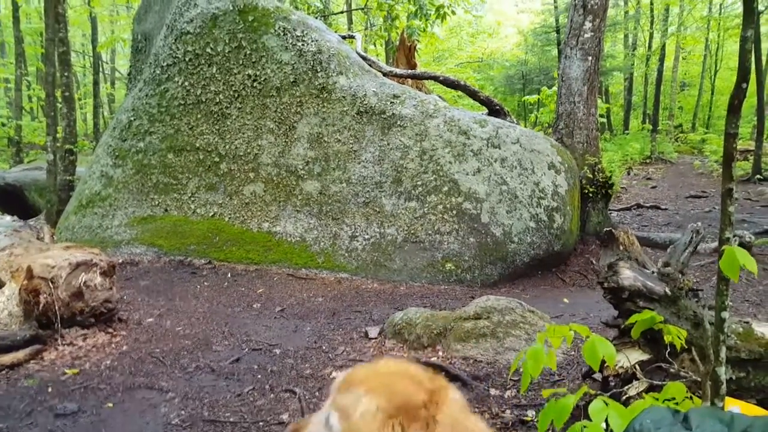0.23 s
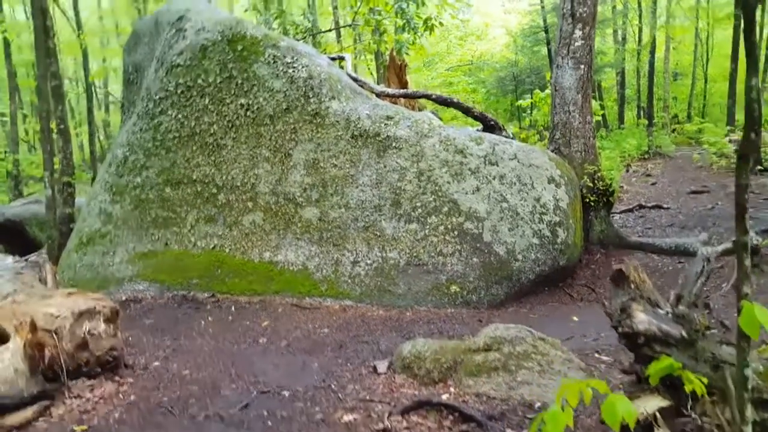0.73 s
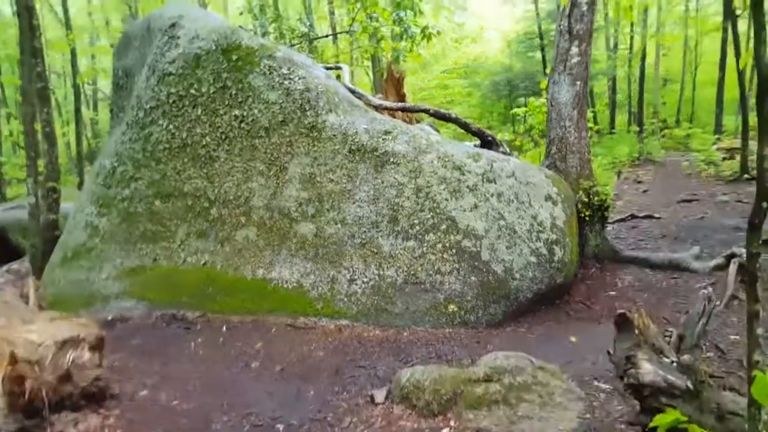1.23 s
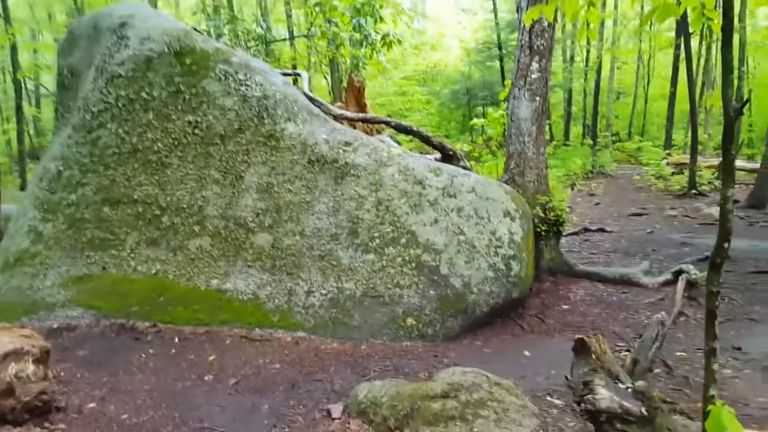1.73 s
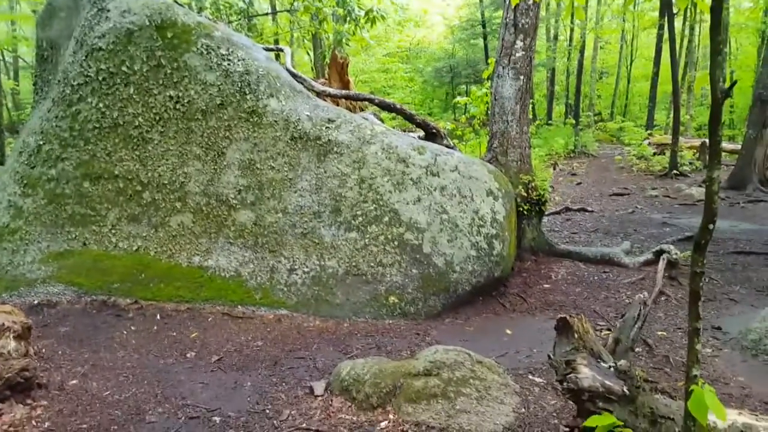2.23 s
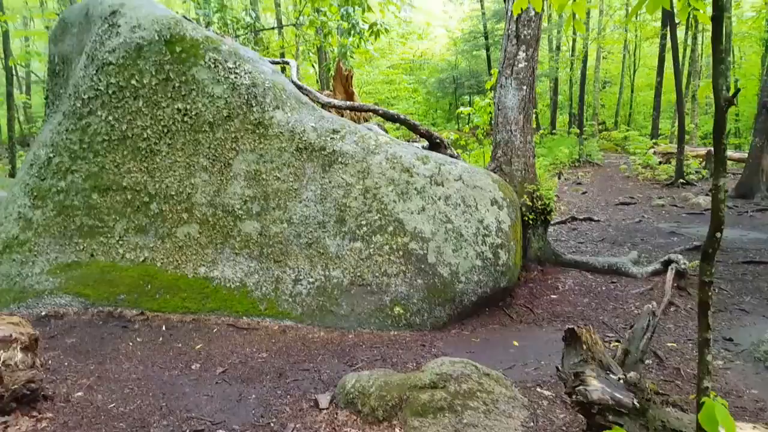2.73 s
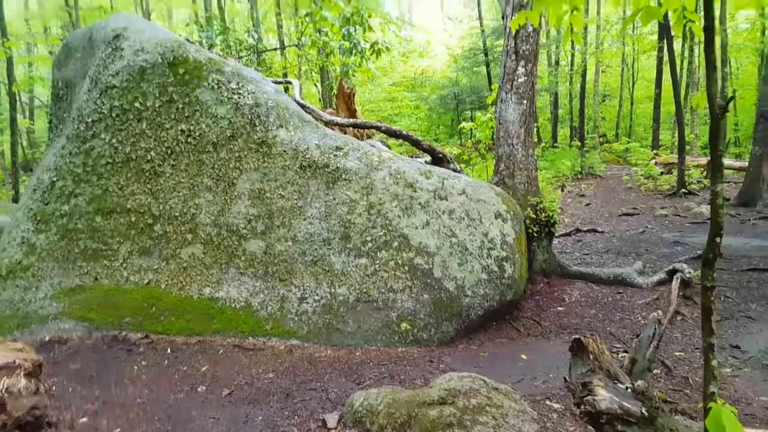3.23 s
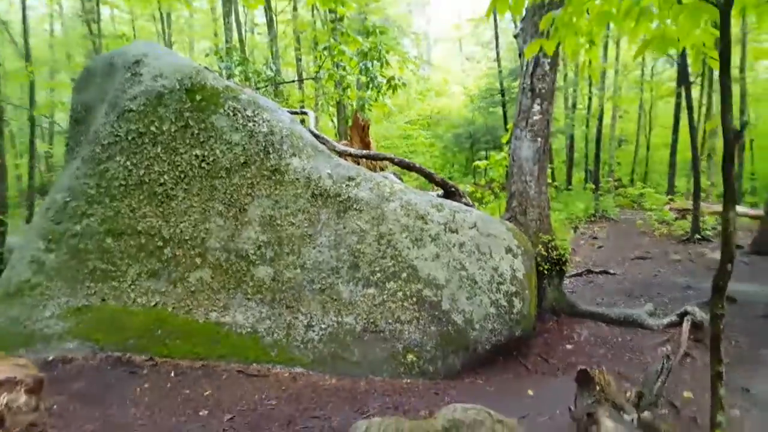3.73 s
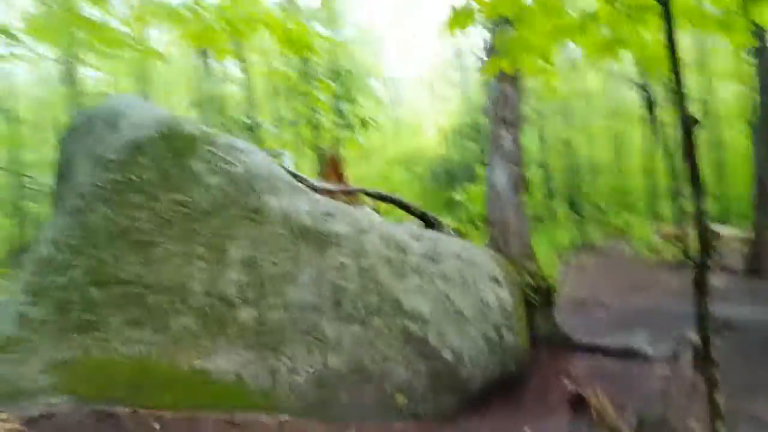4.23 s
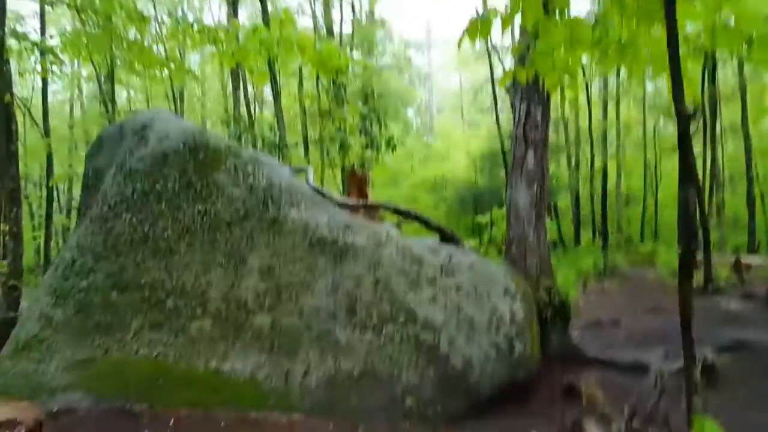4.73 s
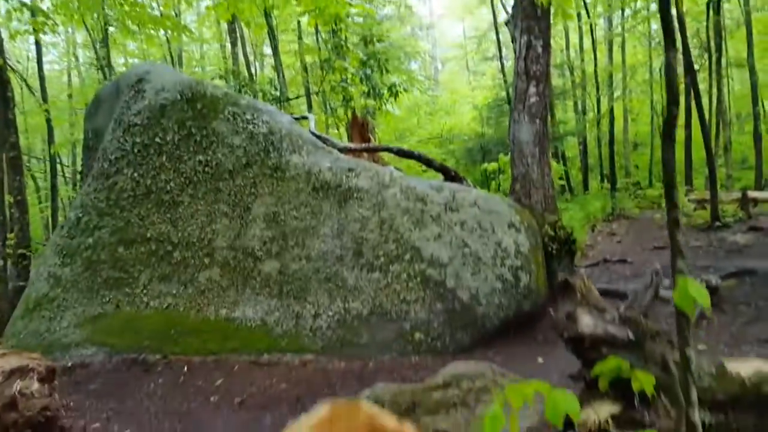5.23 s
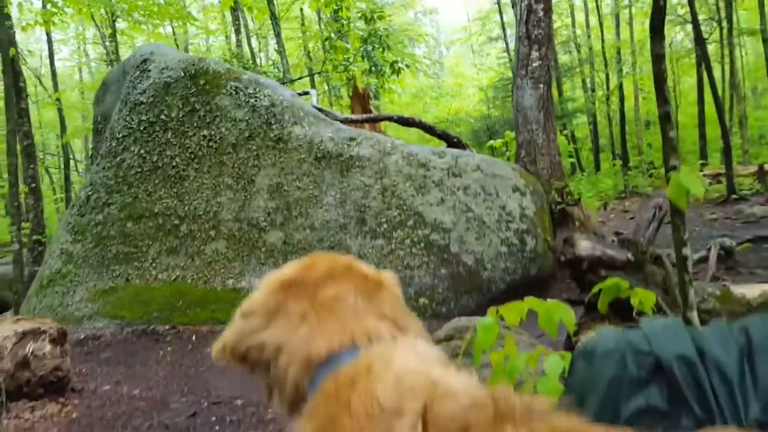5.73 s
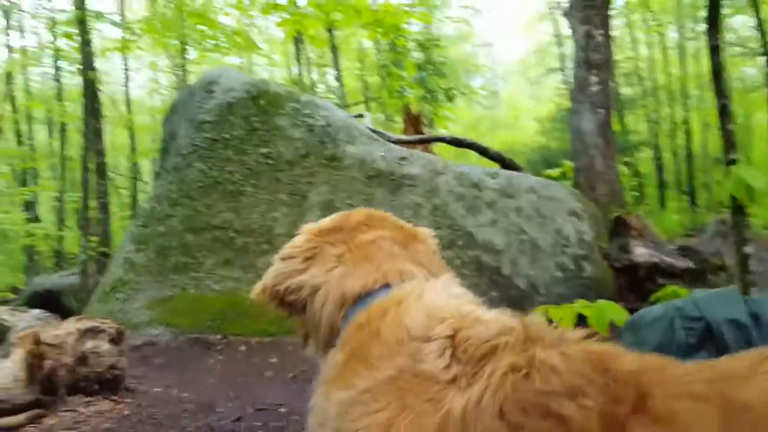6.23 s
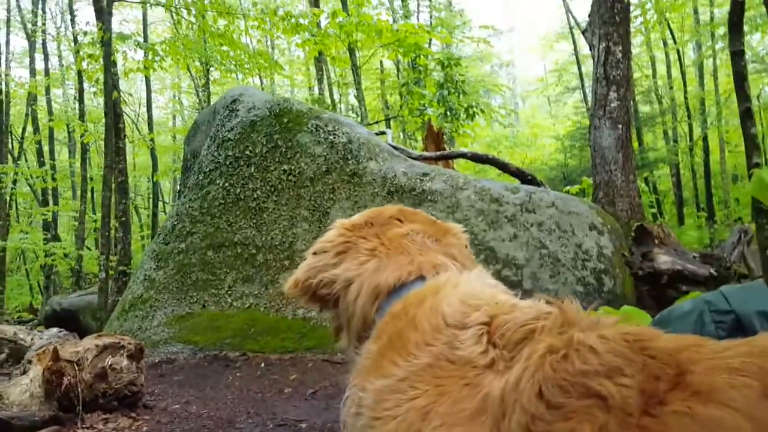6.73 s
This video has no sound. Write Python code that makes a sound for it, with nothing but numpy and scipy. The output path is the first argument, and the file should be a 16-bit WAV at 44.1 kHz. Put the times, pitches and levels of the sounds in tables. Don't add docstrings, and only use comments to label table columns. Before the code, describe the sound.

Handheld stereo phone, close to a dog outdoors: sleeve rustle and scattered drips first, then a steady rumbling growl fluttering about twenty times a second. It drops away, leaving drips and a soft paw thud. A sudden hissing click and rubbing hits the right side, muffling it momentarily. The dog growls again, slips into a brief pure hoot, and resumes lower. There is almost no echo.

```python
import sys
import numpy as np
from scipy import signal
from scipy.fft import rfft, irfft
from scipy.io import wavfile
from scipy.ndimage import uniform_filter1d, map_coordinates

SR = 44100
rng = np.random.default_rng(int(sys.argv[2]) if len(sys.argv) > 2 else 0)


def to_wav(s):
    ch = np.atleast_2d(s).T
    pcm = np.round(np.clip(ch, -1, 1) * 32767)
    wavfile.write(sys.argv[1], SR, pcm.astype(np.int16))


def ratio(d):
    e = np.asarray(d, float) / 20
    return 10 ** e


N = 307816
T = np.arange(N) / SR

# (frequency [Hz], density [dB per Hz])
FOREST = [(24, -30), (40, -3.5), (219, -4), (657, -6.5), (744, -3), (1660, -3.5), (2470, -4), (7610, -16),
          (10300, -24.5), (11600, -25), (15700, -31)]
# (frequency [Hz], likeness [-1 to 1])
ALIKE = [(60, 0.63), (130, 1), (290, 1), (640, 0.54), (1410, -0.49), (3100, 0.23), (6820, -0.53),
         (15000, 0.42)]
# (frequency [Hz], left minus right [dB])
LEAN = [(60, 5), (300, 7), (1300, 1), (4400, -2.5), (15000, 7)]
# (frequency [Hz], density [dB per Hz])
CLOTH = [(100, -10), (500, -8), (1700, -4.5), (2500, -2), (3600, -6.5), (7000, -10.5), (10000, -15.5),
         (13000, -18), (15700, -20.5)]
# (start [s], length [s], peak level [dB])
RUSTLES = [
    (0.23, 0.67, -43.5),
    (0.597, 0.99, -48.5),
    (1.498, 1.3, -62),
    (3.898, 0.31, -66),
    (4.384, 0.12, -51.5),
    (4.96, 0.61, -48.5),
    (5.393, 0.98, -50.5),
    (6.1, 0.89, -58.5),
]
# (frequency [Hz], time to fall 60 dB [s])
TREES = [(100, 0.09), (1000, 0.085), (8000, 0.08)]

# (time [s], peak level [dB], frequency [Hz], left minus right [dB])
DULL_DROPS = [(.305, -27, 620, 2), (.344, -40, 635, 4), (.874, -38, 1090, 8), (.8895, -37, 594, 3),
              (.894, -36.5, 510, 4), (.903, -39, 990, 2), (.9505, -36, 1300, 2), (.96, -29, 900, -3),
              (.977, -29.5, 3040, 6), (1.4631, -38, 1340, 5), (1.8781, -31, 1270, -4),
              (1.93, -36, 2787, -7), (2.151, -40, 1201, 0), (2.938, -35, 574.2, 3),
              (3.096, -43.5, 423, -12), (3.122, -40, 439, 4), (3.166, -29.5, 566, 4),
              (3.708, -42.5, 1610, -11), (3.81, -37, 1070, -3), (3.924, -36.5, 423, 1.5),
              (3.944, -39, 470, 3), (3.98, -35, 466, .6), (4.528, -40, 476, 3), (4.059, -38, 630, 0),
              (4.103, -29.5, 600, 1), (5.3844, -36.5, 1470, -5), (5.5694, -41, 1220, 2),
              (6.0192, -35, 1990, -7), (6.0666, -38.5, 1460, -7), (6.2332, -42, 1230, -2),
              (6.8319, -36, 1100, -9)]
# (time [s], peak level [dB], frequency [Hz], left minus right [dB])
LEAF_DROPS = [
    (.054, -38, 458, 1.5),
    (.096, -39, 507, 3),
    (.717, -35, 590, -5),
    (1.3404, -36.5, 1400, 0),
    (1.3894, -32.5, 877, 0),
    (2.4329, -35.5, 3360, -8),
    (5.6894, -38.5, 2650, -4),
]
# (time [s], peak level [dB], frequency [Hz], left minus right [dB])
THUDS = [
    (.31, -36.5, 256, 2),
    (1.002, -40, 110.7, -4),
    (1.023, -37, 101, -9),
    (2.95, -45.5, 89, 5),
    (4.105, -32.5, 260, 0),
]
# (time [s], peak level [dB], frequency [Hz], left minus right [dB])
SPRAY = [(.268, -58.5, 6000, 0), (1.478, -58, 6100, -1.5), (3.038, -62.5, 6000, -4), (3.203, -57, 6030, 3),
         (3.2335, -56, 5000, 0), (3.6775, -57, 6000, -4), (3.86, -59, 6030, 0), (5.624, -61, 5940, -3)]

# (time [s], hiss level [dB], gap resonance [Hz], seal [0-1], rubbing level [dB])
SLIDE_ON = [
    (4.54, -55, 7500, 0, -53),
    (4.572, -29.5, 7400, 0.24, -44),
    (4.596, -21, 5500, 0, -42),
    (4.611, -13, 1960, 0.28, -32),
    (4.628, -19.5, 3550, 0.1, -41),
    (4.647, -23, 4750, .1, -27),
    (4.657, -34, 5000, 0.1, -20),
    (4.69, -73, 2500, .85, -32),
    (4.745, -90, 1200, .99, -64),
]
# (time [s], hiss level [dB], gap resonance [Hz], seal [0-1], rubbing level [dB])
SLIDE_OFF = [
    (4.758, -74, 900, 0.81, -32),
    (4.796, -54, 1300, .75, -32),
    (4.81, -39, 1690, 0.73, -25),
    (4.84, -37.5, 2500, 0.86, -26),
    (4.863, -35, 3430, 0.63, -23.5),
    (4.877, -38, 3560, 0.14, -35),
    (4.89, -46.5, 2490, 0.027, -42),
    (4.95, -48, 2600, 0, -43.5),
    (5.0, -70, 2000, 0, -59),
]
# (time [s], level [dB])
SQUEAK = [(4.895, -95), (4.92, -53), (4.96, -54), (4.99, -95)]
# (time [s], peak level [dB], frequency [Hz])
PUMPS = [(4.581, -25, 1350), (4.59, -24, 1250), (4.6, -21, 1400), (4.605, -18, 1050), (4.61, -12, 1200),
         (4.65, -18, 116), (4.665, -18, 333), (4.684, -21.5, 110), (4.712, -27, 120), (4.754, -25, 110),
         (4.767, -14, 190), (4.783, -27, 400), (4.801, -18, 300)]
# (frequency [Hz], gain [dB])
SEAL_CUTS = [(4300, 0), (6200, -35), (10000, -35), (12000, 0)]

# (frequency [Hz], phase by which the left leads [rad])
LEAD = [(80, 0.073), (200, 0.14), (400, 0.067), (1000, .56)]
# (time [s], pitch [Hz], level [dB])
HOOT = [(6.146, 175.8, -64), (6.156, 173, -26), (6.175, 162.4, -25), (6.195, 156.3, -20), (6.23, 153, -25),
        (6.27, 146.6, -22), (6.287, 145, -26), (6.3, 141, -60)]
# (multiple [1], level [dB])
HOOT_ORDERS = [(1, -5), (2, -21), (3, -23.5), (4, -31)]
# (frequency [Hz], gain [dB])
SHUT = [(30, -64), (70, 5.5), (100, 3), (200, 2), (300, -4.5), (420, -5), (520, -39), (700, -15.5),
        (2500, -68)]
# (frequency [Hz], gain [dB])
OPEN = [(30, -19.5), (70, -3), (105, -3.5), (210, -1.5), (260, -9), (320, -0.5), (420, -1.5), (520, -21),
        (640, -13), (750, -20.5), (900, -39.5), (1080, -29), (1300, -38), (2500, -90)]
# (frequency [Hz], gain [dB])
TURNED_SHUT = [(30, -55), (70, 2.5), (95, 0), (190, -0.5), (270, -1.5), (370, -2.5), (470, -28.5),
               (650, -15), (800, -33.5), (2500, -57)]
# (frequency [Hz], gain [dB])
TURNED_OPEN = [(30, -19), (70, -8.5), (100, -1), (200, 1), (260, -28.5), (320, -9), (500, -11),
               (620, -15.5), (720, -31), (1000, -34), (1350, -30), (1700, -41.5), (2500, -73)]
# (frequency [Hz], gain [dB])
DEEP = [(30, -11), (65, -12), (90, 0), (180, 2), (260, -17.5), (360, -9), (450, -16.5), (550, -9),
        (640, -20.5), (780, -29), (2500, -72)]
THROATS = [(SHUT, OPEN), (TURNED_SHUT, TURNED_OPEN), (DEEP, TURNED_OPEN)]
# (time [s], fold beat [Hz], level [dB], mouth opening [0-1])
GROWLS = [
    [(1.06, 79.2, -42, 0.3), (1.17, 91.3, -33.5, 0.22), (1.33, 106.3, -30, 0.3), (1.7, 108.7, -29.5, 0.95),
     (2.15, 114, -28.5, 0.93), (2.55, 104, -28.5, 0.88), (2.76, 94.8, -30, 0.65), (2.82, 84, -37, 0.24),
     (2.87, 80, -76, 0)],
    [(4.775, 75.5, -54, .2), (4.83, 75.6, -42, 0.5), (4.97, 84.5, -36.5, 0.4), (5.16, 98.7, -32.5, 0.44),
     (5.3, 105, -30, 0.48), (5.55, 104.6, -30, 0.71), (5.95, 104.4, -29.5, 0.81), (6.14, 101.7, -31, 0.9),
     (6.153, 97.2, -28.5, 0.9)],
    [(6.29, 95.4, -31, 0.4), (6.32, 94, -29, 0.6), (6.6, 92.3, -30, 0.3), (6.8, 88.74, -30.5, 0.3),
     (6.98, 85, -31, 0.3)],
]
LEAKS = [.1, .26, .13]
LOOSE = [1.15, 1.5, .9]
RECOVER_DB = [1.2, 0, 0]
# (frequency [Hz], width [Hz], lift [dB])
RINGS = [(320.7, 35, 1), (638, 35, 3), (1093, 60, 3)]
# (time [s], delay [ms], weakening [dB])
MARKED_STUMBLES = [(1.241, 1.5, 3), (1.281, 1.5, 3), (1.321, 1.5, 2), (1.36, 4.9, 2), (1.402, 2.5, 3),
                   (1.44, 4, 3), (1.482, 3, 2), (1.523, 1.6, 3), (1.562, 1.4, 3), (1.6, 2.3, 0),
                   (1.612, 5, 3), (1.626, 0, 4), (1.683, 1.2, 4), (1.693, 0, 8), (1.73, 4, 4), (1.771, 1, 6),
                   (1.809, 2, 2), (1.857, 1, 4.5), (1.895, 1.6, 4), (1.943, 3, 5), (1.983, 2.3, 0),
                   (2.023, 2, .5), (2.071, 2.2, 3), (2.119, 2.3, 5.5), (2.158, 2.2, 0), (2.206, 1.6, 3.5),
                   (2.254, 2.1, 5), (2.293, 1.8, 0), (2.342, 2, 2), (2.391, 2, 1), (2.442, 1.6, 3.5),
                   (2.493, 1.9, 2), (2.535, 2, 1), (2.587, 1.9, 2.5), (2.64, 1.9, 1), (2.683, 1.6, 0),
                   (2.738, 1.5, 0), (2.783, 1.5, 1),
                   (4.983, 1.6, 3), (5.064, 1.6, 3), (5.141, 4.2, 1.5), (5.186, 2.6, 4.5), (5.23, .6, 5),
                  (5.27, 2, 3), (5.311, 4.8, 1.5), (5.355, 1.8, 1.5), (5.396, 5.1, 2), (5.44, 4, 3),
                  (5.483, 4.8, 2.5), (5.526, 4.6, 1), (5.581, .5, 3), (5.621, 0, 3), (5.658, 4, 2),
                  (5.7, 4, 0), (5.743, 1.7, 1), (5.792, 5.1, 1.5), (5.838, 0, 2.5), (5.877, 1.1, 2.5),
                  (5.927, 4.4, 3), (5.97, 1.4, 3), (6.021, 2.8, 2), (6.062, .7, 3.5), (6.114, 0, 4),
                  (6.35, 1, 4), (6.393, 1.3, .5), (6.437, 2, 0), (6.493, 2, 0), (6.549, 1.5, 2),
                  (6.593, 2, 0), (6.639, 1.5, 0), (6.697, 1.8, 0), (6.744, 2.1, 0), (6.791, 1.7, 0),
                  (6.849, 1.7, .5), (6.896, 1.9, 0), (6.943, 2, .5)]
STUMBLES = MARKED_STUMBLES
FLUTTER_S = 0.044


def unit(x):
    return x / np.sqrt(np.mean(x ** 2) + 1e-20)


def along(points, hz):
    f, v = np.transpose(points)
    return np.interp(np.log(hz + 1), np.log(f + 1), v)


def curves(rows, t=T):
    s, *cols = np.transpose(rows)
    return [np.interp(t, s, c) for c in cols]


def wobble(rate):
    return map_coordinates(rng.standard_normal(int(N * rate / SR) + 4), [T * rate])


def causal(x, spectrum):
    gain = ratio(along(spectrum, np.fft.rfftfreq(16384, 1 / SR)))
    cepstrum = irfft(np.log(gain + 1e-6))
    cepstrum[1:8192] *= 2
    cepstrum[8193:] = 0
    response = irfft(np.exp(rfft(cepstrum)))[:8192]
    return signal.fftconvolve(x, response)[:len(x)]


def rush(spectrum, alike, patchy_db):
    hz, _, z = signal.stft(rng.standard_normal((2, N + 1024)), SR, nperseg=1024)
    patches = uniform_filter1d(rng.standard_normal(z.shape[1:]), 12, 0)
    patches = unit(uniform_filter1d(patches, 5, 1))
    turn = np.arccos(np.clip(along(alike, hz), -1, 1))[:, None] / 2
    mid, side = z[0] * np.cos(turn), z[1] * np.sin(turn)
    lean = ratio(along(LEAN, hz)[:, None] / 2)
    pair = np.array([(mid + side) * lean, (mid - side) / lean])
    pair = pair * ratio(along(spectrum, hz)[:, None] + patchy_db * patches)
    return unit(signal.istft(pair, nperseg=1024)[1][:, :N])


def forest():
    level_db = -50 + 0.052 * wobble(4.1) + 0.36 * wobble(12)
    return ratio(level_db) * rush(FOREST, ALIKE, patchy_db=1.1)


def jacket():
    power = 0
    for s, length, db in RUSTLES:
        swell = abs(np.sin(np.pi * np.clip((T - s) / length, 0, 1))) ** 0.85
        power = power + (ratio(db) * swell) ** 2
    likeness = [(300, 0.83), (1500, -0.62), (3000, 0.13)]
    return np.sqrt(power) * ratio(0.5 + 1.4 * wobble(8.2)) * rush(CLOTH, likeness, patchy_db=2.0)


def trees(x):
    hz, t, z = signal.stft(rng.standard_normal((2, SR // 2)), SR, nperseg=256)
    tail = signal.istft(z * ratio(-60 * t / along(TREES, hz)[:, None]), SR, nperseg=256)[1]
    return signal.fftconvolve(x[None], tail / np.linalg.norm(tail[0]), axes=1)[:, :N]


def drop(hz, splash_db):
    t = np.arange(2048) / SR
    noise = rng.standard_normal((3, len(t)))
    band = signal.butter(2, [hz / 2.2, hz * 2.6], "band", fs=SR, output="sos")
    puff = unit(signal.sosfilt(band, noise[0])) * ratio(-60 * t / 0.018)
    ring = np.sin(2 * np.pi * hz * t) * ratio(-60 * t / (0.005 + 4.3 / hz)) * (1 + hz / 4000)
    knock = 2.2 * (ring + 0.22 * puff) * (1 - np.exp(-t / 0.0004)) ** 2
    high = signal.butter(2, 5000, "high", fs=SR, output="sos")
    splash = ratio(splash_db + 4.5 - 60 * t / 0.0068) * signal.sosfilt(high, noise[1:])
    return knock + splash


def drops():
    lag_s = 0.0008
    kinds = [(DULL_DROPS, -23), (LEAF_DROPS, -7.5), (THUDS, -40), (SPRAY, 14.5)]
    rows = [(*row, splash_db) for table, splash_db in kinds for row in table]
    for a, b, c, d in rng.random((220, 4)):
        rows.append((6.9 * a, -50 + 9 * b ** 2, 300 * 9 ** c, 8 * d - 4, -16))
    out = np.zeros((2, N + 2048))
    for s, db, hz, pan_db, splash_db in rows:
        start = round((s + lag_s) * SR)
        sides_db = np.clip(pan_db, -8, 8) * np.array([[0.5], [-0.5]])
        out[:, start:start + 2048] += ratio(db + sides_db) * drop(hz, splash_db)
    return out[:, :N]


def finger(right):
    slide = SLIDE_ON + SLIDE_OFF
    hz, t, z = signal.stft([right, *rng.standard_normal((3, N))], SR, nperseg=256)
    hz = hz[:, None] + 1
    hiss_db, gap_hz, seal, _ = curves(slide, t)
    cover_db = 23 * abs(seal) ** 3.6
    z[0] *= ratio(-cover_db * hz / (hz + 900))

    detune = 1.75 * (hz / gap_hz - gap_hz / hz)
    gap = 1 / np.sqrt(1 + detune ** 2) ** 1.18
    gap = gap + 0.25 * ratio(-18 * seal)
    port = [(6000, -8.5), (9000, -18), (10500, -22), (13000, -15.5), (16000, -16.5)]  # (Hz, dB)
    gap = gap * ratio(along(port, hz) + seal * along(SEAL_CUTS, hz))
    z[1] *= ratio(hiss_db) * gap / np.sqrt(np.mean(gap ** 2, axis=0))
    z[3] *= ratio(curves(SQUEAK, t)[0]) * unit(np.exp(-((hz - 8000) / 500) ** 2))
    heard, hiss, buffet, squeak = signal.istft(z, nperseg=256)[1][:, :N]

    membrane = [(20, -18), (90, 5.5), (200, 6), (500, 6.5), (1100, 1), (2200, -7), (5000, -30.5)]
    rubbing = ratio(curves(slide)[3]) + ratio(-63.5)
    buffet = rubbing * unit(causal(buffet, membrane))
    hiss = hiss * ratio(0.96 * wobble(400) + 1.15 * wobble(90))
    loud = heard + hiss + buffet * ratio(wobble(120)) + squeak
    for s, db, pump_hz in PUMPS:
        since = np.clip(T - s, 0, 1)
        decay_db = 60 * since * pump_hz / 7.3
        loud = loud + ratio(db - decay_db) * np.sin(2 * np.pi * pump_hz * since)
    return loud / (1 + abs(loud / 0.62) ** 4) ** 0.25


def hoot():
    hz, db = curves(HOOT)
    phase = 2 * np.pi * np.cumsum(hz * (1 + 0.0211 * wobble(70))) / SR
    tone = 0
    for k, level in HOOT_ORDERS:
        tone = tone + ratio(level + (k > 1) * 0.46 * wobble(66)) * np.cos(k * phase)
    breath_colour = [(120, -36), (280, -5), (600, -7), (800, -18), (2500, -64)]  # (Hz, dB)
    breath = unit(causal(rng.standard_normal(N), breath_colour))
    return ratio(db + 2 + 0.29 * wobble(40)) * (tone + ratio(-24.5) * breath)


def slips(stretch, loose):
    edge_s, scatter_s, delay_ms, spread = 0.04, 0.0049, 1.75, 0.25
    start, end = stretch[0][0] + edge_s, stretch[-1][0] - edge_s
    big = [row for row in STUMBLES if start < row[0] < end]
    posts = [start - FLUTTER_S] + [row[0] for row in big] + [end + FLUTTER_S]
    gaps = []
    for a, b in zip(posts, posts[1:]):
        turns = max(round((b - a) / FLUTTER_S), 1)
        gaps.append(np.linspace(a, b, turns + 1)[1:-1])
    s = np.concatenate(gaps)
    chance = rng.standard_normal((2, len(s)))
    delays = loose * delay_ms * np.exp(spread * chance[1])
    small = np.transpose([s + scatter_s * chance[0], delays, np.zeros(len(s))])
    return np.vstack([small, *big])


def folds(pitch, trips, recover_db):
    jitter, drag_s, recover_s, fade_db = 0.0063, 0.0077, 0.0096, 2.17
    s, delay_ms, weak_db = np.transpose(trips)
    marks = np.zeros(N)
    marks[np.round((s + drag_s) * SR).astype(int)] = delay_ms / 1000
    big = marks > 0.0027
    held = 0
    for mark, bump in [(marks * big, np.hanning(620)), (marks * ~big, np.hanning(1250))]:
        held = held + signal.fftconvolve(mark, bump / bump.sum() * SR, "same")
    beat = curves(pitch)[0] * (1 + jitter * wobble(60))
    turns = np.cumsum(beat * np.clip(1 - held, 0, 1)) / SR

    lock = np.sort([pitch[0][0]] + [row[0] for row in STUMBLES]) - 0.0018
    free = np.interp(lock, T, turns)
    whole = np.cumsum(np.round(np.diff(free, prepend=0)))
    locked = turns + np.interp(T, lock, whole - free)
    at = np.flatnonzero(np.diff(np.floor(locked)) > 0)

    s = at[np.argmin(abs(at[:, None] / SR - s), axis=0)] / SR
    since = at[:, None] / SR - s
    weak = np.max(weak_db * np.exp(-(since / 0.0033) ** 2), axis=1)
    rest = np.min(np.where(since > 0, since, 1), axis=1)
    weak += fade_db * np.clip(rest / FLUTTER_S, 0, 1)
    lingering = np.where(since > 0, delay_ms * np.exp(-abs(since) / recover_s), 0)
    weak += recover_db * np.max(lingering, axis=1)
    return at, weak


def growl(stretch, throats, leak, loose, rings, recover_db):
    trips = slips(stretch, loose)
    at, weak = folds(stretch, trips, recover_db)
    chance = rng.standard_normal((len(at), 2))
    soft, sharp = np.zeros((2, N))
    soft[at] = ratio(0.5 * chance[:, 0] - 0.34 * weak)
    sharp[at] = soft[at] * ratio(1.1 * chance[:, 1] - 1.87 * weak)
    for s, delay_ms, _ in trips:
        last = at[np.argmin(abs(at / SR - s))]
        soft[last + int(0.0063 * SR)] = np.clip(0.21 * (delay_ms - 1.6), 0, 0.9)
    slow = np.hanning(230)
    closures = sharp + signal.fftconvolve(soft - sharp, slow / slow.sum(), "same")

    puff = signal.fftconvolve(sharp, np.hanning(260))[:N] * rng.standard_normal(N)
    puff = signal.sosfilt(signal.butter(2, 300, "high", fs=SR, output="sos"), puff)
    source = unit(closures) + leak * unit(puff)

    shut, wide = (unit(causal(source, throat)) for throat in throats)
    for hz, width_hz, lift_db in rings:
        ringing = signal.lfilter(*signal.iirpeak(hz, hz / width_hz, SR), wide)
        wide = unit(wide + ratio(lift_db) * ringing)
    _, db, opening = curves(stretch)
    opening = np.clip(opening, 0, 1) ** 1.19
    voiced = 1.0 * (T > stretch[0][0]) * (T < stretch[-1][0] + 0.005)
    return uniform_filter1d(voiced, 500) * ratio(db) * ((1 - opening) * shut + opening * wide)


def at_ports(dog):
    half = 0.5j * along(LEAD, np.fft.rfftfreq(2 * N, 1 / SR))
    turn = 1.4j
    return irfft(rfft(dog, 2 * N) * np.exp([half - turn, -half - turn]))[:, :N]


def scene():
    dog = hoot()
    for part in zip(GROWLS, THROATS, LEAKS, LOOSE, [RINGS, [], []], RECOVER_DB):
        dog = dog + growl(*part)
    water = drops()
    echoes = ratio(-39) * trees(dog) + ratio(-8) * trees(water[0])
    left, right = at_ports(dog) + water + echoes + forest() + jacket()
    return np.array([left, finger(right)])


def low_pass(x):
    return signal.sosfilt(signal.butter(12, 15830, fs=SR, output="sos"), x)


def record(dry):
    passed = np.fft.rfftfreq(2 * N, 1 / SR) < 15830
    kept = irfft(rfft(dry, 2 * N) * passed)[:, :N]
    return low_pass(kept)


dry = scene()
out = record(dry)
to_wav(out)
```